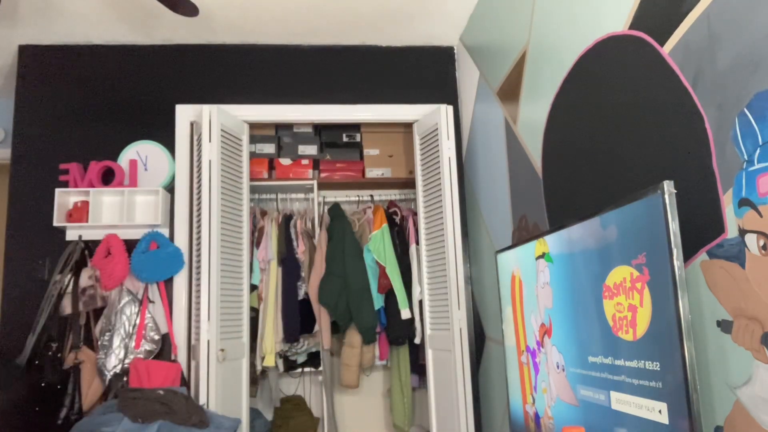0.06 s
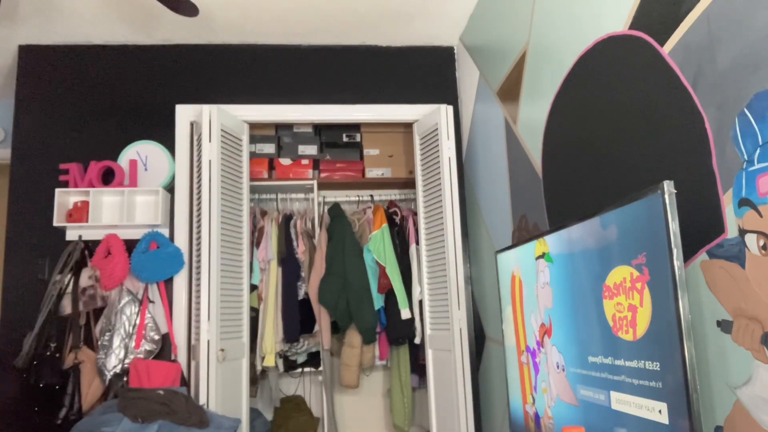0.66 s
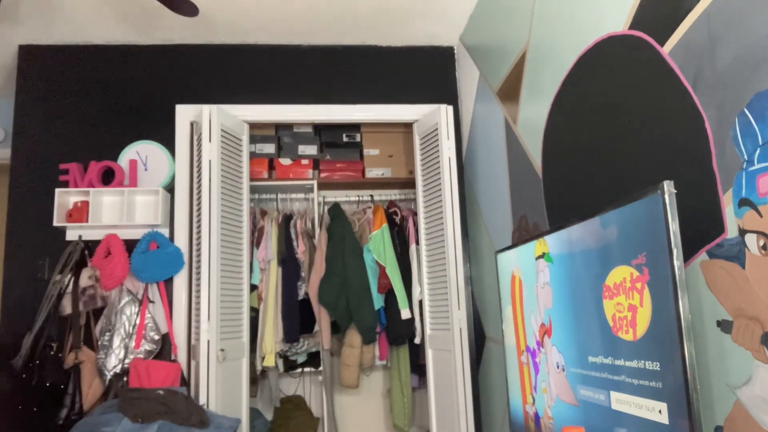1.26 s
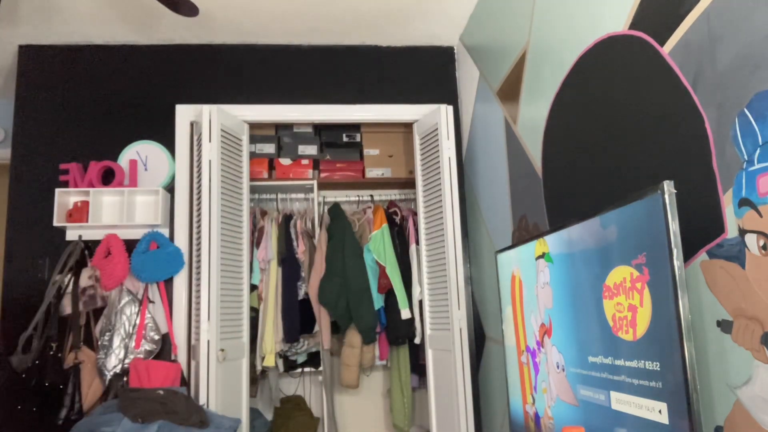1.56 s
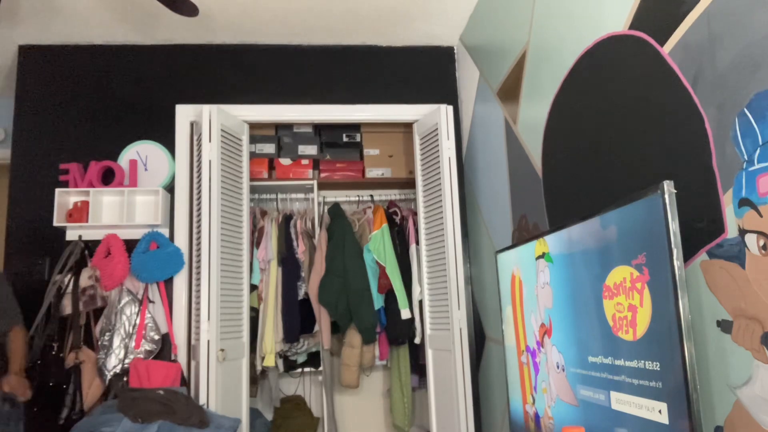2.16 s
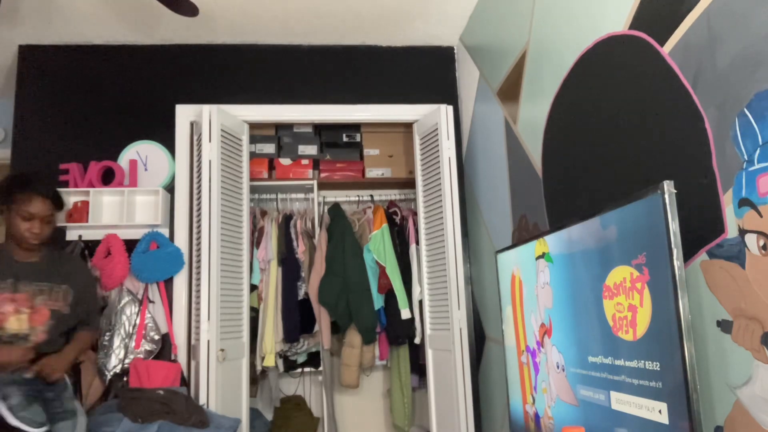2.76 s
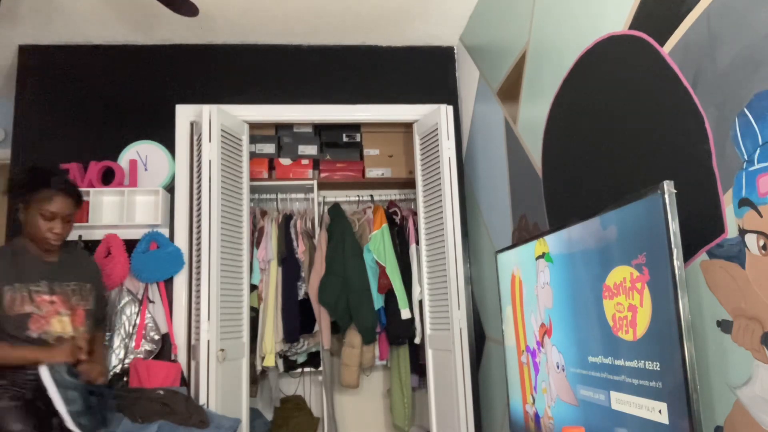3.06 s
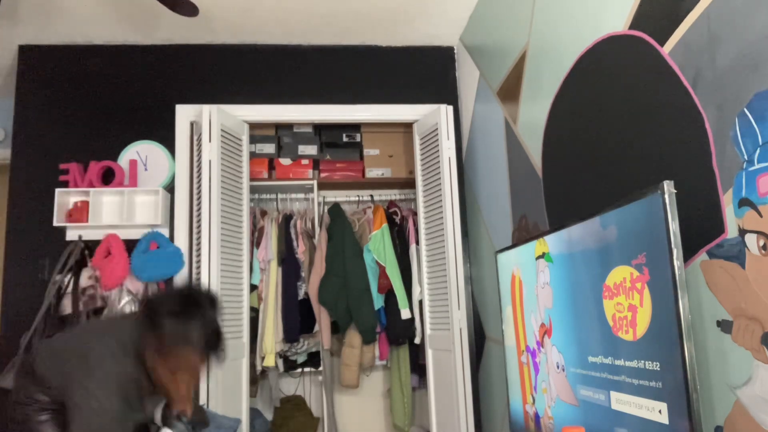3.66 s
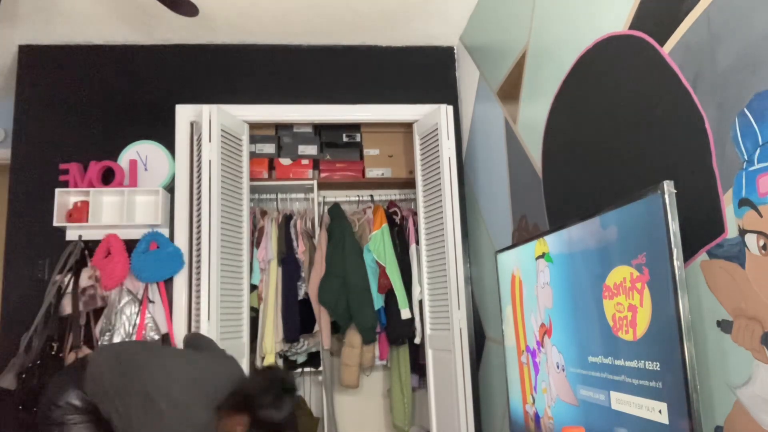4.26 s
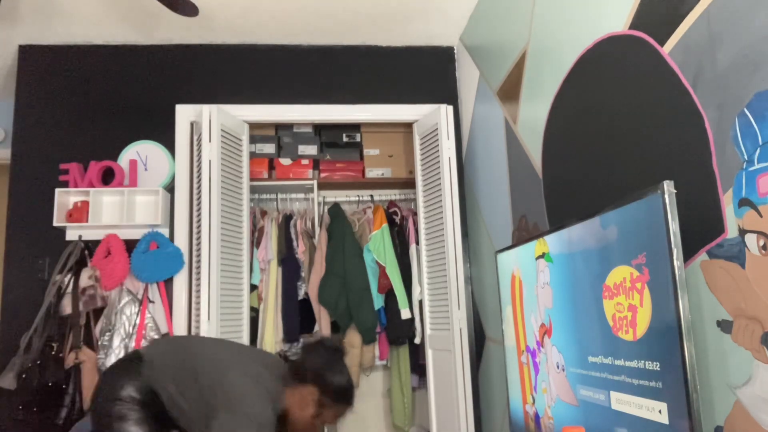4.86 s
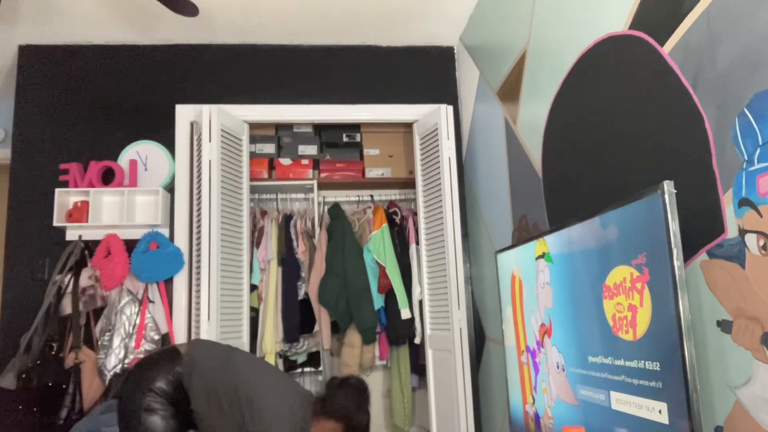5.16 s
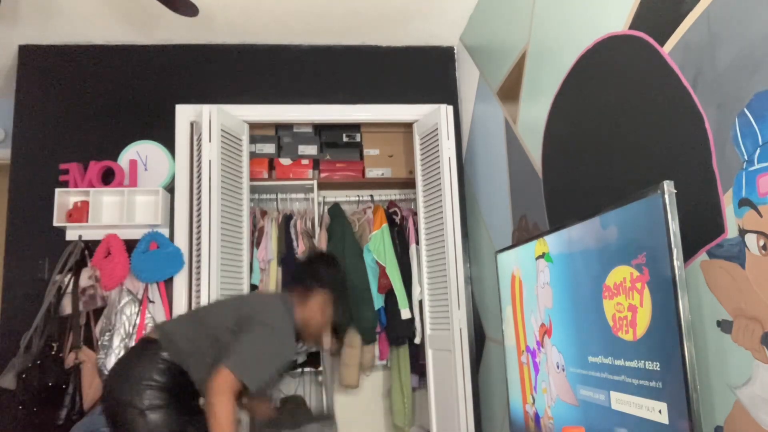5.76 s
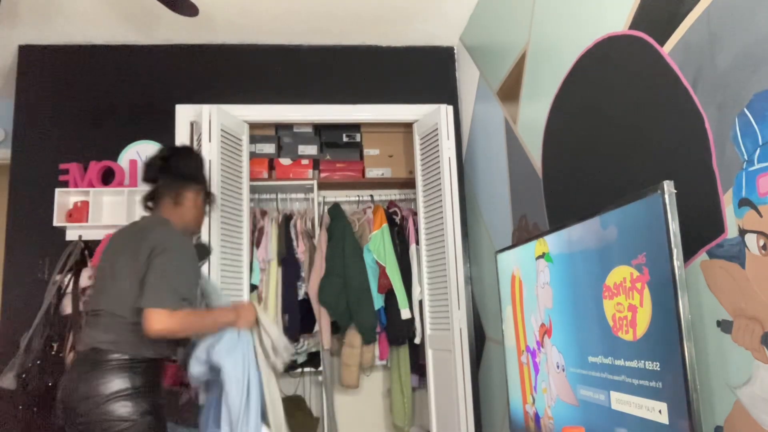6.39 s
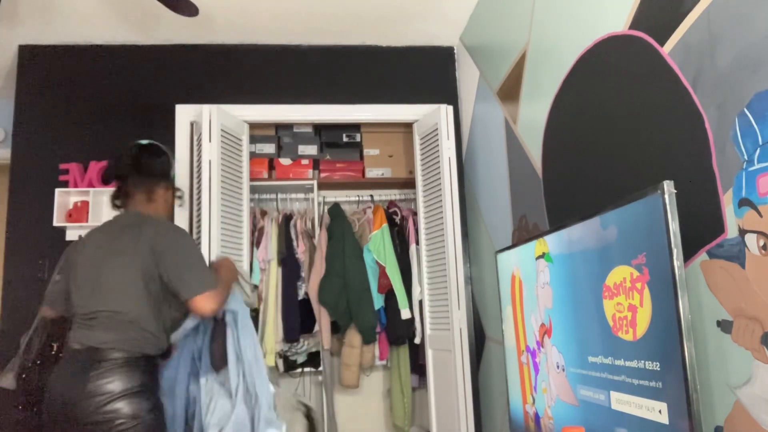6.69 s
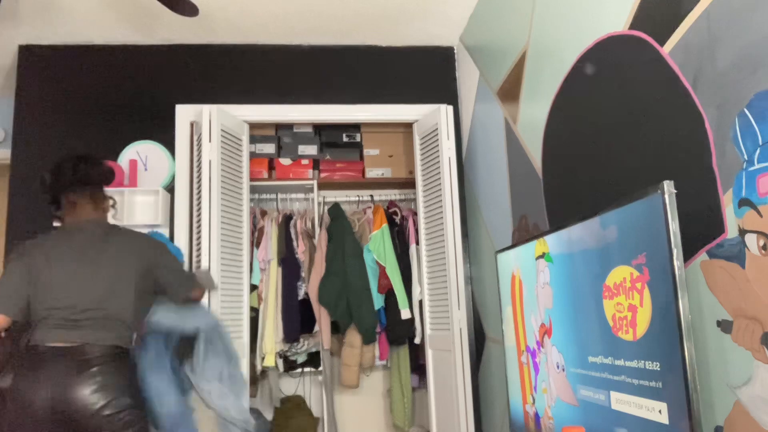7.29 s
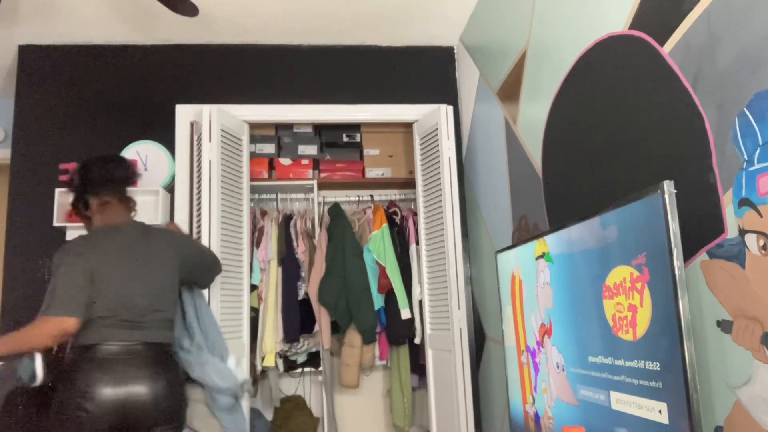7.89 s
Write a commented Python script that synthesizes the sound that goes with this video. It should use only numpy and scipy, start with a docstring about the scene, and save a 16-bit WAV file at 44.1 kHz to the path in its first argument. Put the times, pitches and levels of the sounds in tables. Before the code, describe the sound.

Clothes rustle as someone rummages through a heap in a small room, with soft thumps, hollow knocks and a high metal jingle.

```python
"""Cloth swishes over soft thumps as someone walks into a small bedroom, kneels at a heap of clothes
and pulls out a garment. Stick-slip friction of fibres makes the hiss, buckling creases the crumpling.
Steps and dropped things excite the low modes of floor and room; hard bits in the heap tap and clack.
While the garment is lifted, its small metal fittings collide and ring very high."""
import sys
import numpy as np
from scipy import signal
from scipy.fft import rfft, irfft, next_fast_len
from scipy.io import wavfile

SR = 44100
rng = np.random.default_rng(int(sys.argv[2]) if len(sys.argv) > 2 else 0)


def master(y):
    """Save y as 16-bit WAV."""
    cut = np.clip(np.atleast_2d(y).T, -1, 1)
    pcm = np.round(cut * 32767)  # scale
    wavfile.write(sys.argv[1], SR, pcm.astype(np.int16))


N = 349713

# Noise spectra: (frequency [Hz], relative spectral level [dB])
FLAP_SPECTRUM = [(90, -18), (150, 4.5), (235, 0.5), (340, -1.5), (480, -14.5), (800, -30.5)]  # heavy folds and dull thuds
CRUMPLE_SPECTRUM = [(350, 17), (550, 6.5), (850, 4), (1300, -1.5), (2100, -6), (3000, -5), (5000, -16)]  # creases and woody knocks
CRACK_SPECTRUM = [(900, 6), (1900, 7), (2700, 4), (4200, -2), (6300, -12), (8800, -9), (12000, -14),
                  (15000, -21)]  # hard contact
TICK_SPECTRUM = [(3000, -25), (6300, -6), (8800, -0.5), (11000, 6), (13000, 5.5), (14400, 13), (15200, 9)]  # metal on metal
# Cloth slides over cloth, except the brief fizz at 4.326 s, which goes with the tick of a metal contact: (time
# [s], duration [s], hiss level [dB], fizz level [dB])
SWISHES = [(0.0, 0.067, -39, -43.5), (0.07, .12, -43, -43.5), (0.21, 0.072, -45.5, -52),
           (0.29, 0.032, -42.5, -47), (0.48, 0.25, -46, -47.5), (0.7, 0.16, -48, -55),
           (1.06, 0.32, -49, -54), (1.17, 0.37, -48, -53), (1.495, 0.13, -40.5, -45),
           (1.56, 0.28, -44, -44), (1.76, 0.013, -25.5, -32.5), (1.805, 0.032, -37.5, -41),
           (1.85, 0.086, -44.5, -47), (1.93, 0.23, -47.5, -52.5), (2.1, 0.38, -47.5, -50.5),
           (2.35, 0.64, -48.5, -52), (2.84, 0.091, -38.5, -39), (3.0, 0.17, -50, -55.5),
           (3.21, 0.1, -54, -53), (3.3, 0.41, -45.5, -47.5), (3.6, 0.37, -44.5, -53),
           (3.7, 0.24, -43.5, -42.5), (3.99, 0.062, -55, -44), (4.092, 0.028, -50, -44.5),
           (4.18, 0.12, -49.5, -46.5), (4.326, 0.013, -48, -42.5), (4.34, 0.22, -45, -46),
           (4.55, 0.093, -42.5, -45), (4.66, 0.12, -55, -56), (4.74, 0.14, -45.5, -47.5),
           (4.92, 0.24, -52, -53.5), (5.1, 0.17, -47.5, -48.5), (5.21, 0.17, -44.5, -46),
           (5.34, 0.34, -47.5, -47), (5.495, 0.05, -39, -37.5), (5.56, 0.22, -41, -41.5),
           (5.8, 0.29, -45, -46), (6.06, 0.38, -46, -52), (6.228, 0.037, -44, -40), (6.3, 0.12, -67, -63),
           (6.44, 0.28, -46.5, -43.5), (6.53, 0.065, -43.5, -38), (6.668, 0.059, -35, -33),
           (6.78, 0.16, -47.5, -47.5), (7.0, 0.14, -50.5, -53.5), (7.11, 0.24, -44, -45.5),
           (7.21, 0.32, -45, -48), (7.45, 0.23, -46, -51.5), (7.64, 0.76, -48.5, -52.5)]
SWISH_SHAPE = dict(rise_share=0.32, bulge_db=1, base_t60=0.22)


def from_db(db):
    """Amplitude ratio of a level: a factor of ten per 20 dB."""
    return 10 ** (np.asarray(db) / 20)


def unit_rms(x):
    """Normalisation to unit mean power."""
    return x / np.sqrt(np.mean(x ** 2) + 1e-20)


def at_hz(points, hz):
    """Interpolation of a spectrum on a logarithmic frequency axis."""
    freqs, values = np.transpose(points)
    return np.interp(np.log(hz), np.log(freqs), values)


def add(out, start, sound):
    """Superposition of a sound from its start time on."""
    i = max(int(start * SR), 0)
    out[..., i:i + sound.shape[-1]] += sound[..., :N - i]


def decay(t, t60):
    """Exponential free decay, 60 dB in t60 seconds."""
    return from_db(-60 * t / t60)


def gesture(t, length, rise_s, t60):
    """Envelope of a driven sound: a rise, a hold until length, then free decay."""
    rise = np.sin(np.pi / 2 * np.minimum(t / max(rise_s, 1 / SR), 1))
    return rise * decay(np.maximum(t - length, 0), t60)


def movements(rows, rise_share, bulge_db, base_t60):
    """Incoherent addition: overlapping movements sum in power, giving one envelope per level column."""
    power, t = np.zeros((len(rows[0]) - 2, N)), np.arange(SR) / SR
    for start, length, *levels_db in rows:
        arch = np.sin(np.pi * np.minimum(t / length, 1)) - 2 / np.pi
        t60 = base_t60 + 0.32 * length  # long sweeps take longer to stop
        shape = from_db(bulge_db * arch) * gesture(t, length, rise_share * length, t60)
        add(power, start, (from_db(levels_db)[:, None] * shape) ** 2)
    return np.sqrt(power)


def drift(rate_hz):
    """Low-pass noise: a slow random fluctuation of unit rms."""
    r = np.exp(-80 * np.pi * rate_hz / SR)
    slow = signal.lfilter([1], [1, -2 * r, r * r], rng.standard_normal(N // 40 + 2002))[2000:]
    return np.interp(np.arange(N) / 40, np.arange(len(slow)), unit_rms(slow))


def grains(per_s, spread_db):
    """A Poisson process of clicks of uneven size."""
    sizes = from_db(spread_db * np.minimum(rng.exponential(1, N), 4)) * rng.choice([-1, 1], N)
    return sizes * (rng.random(N) < per_s / SR)


def resonator(drive, hz, t60):
    """A damped oscillator: a unit impulse starts a decaying sine of height 1."""
    r, w = from_db(-60 / (t60 * SR)), 2 * np.pi * min(hz, .45 * SR) / SR
    return signal.lfilter([0, np.sin(w)], [1, -2 * r * np.cos(w), r * r], drive + 1e-18)


def room_gain(at):
    """Resonance lifts narrow bands; interference from near surfaces forms a comb below the treble."""
    # Room and furniture: (frequency [Hz], lift [dB])
    resonances = [(233, 4), (356, -2), (484, -3), (661, 3.5), (732, 3), (873, 1.5), (1039, 3.5), (1187, 3),
                  (1351, 3.5), (1575, 4.5), (1909, 6), (2078, 6), (2410, 6), (2690, 5)]
    # Hard surfaces near the microphones: (delay [s], low-frequency amplitude [ratio])
    reflections = [(.0023, 0.33), (.0051, -0.036), (.0087, 0.2), (0.0132, 0.21)]
    width_hz, rolloff_hz = 94, 840
    hz = np.arange(0, SR / 2, 4)
    lift_db = sum(db / (1 + (2 * (hz - centre) / width_hz) ** 2) for centre, db in resonances)
    echoes = sum(share * np.exp(-2j * np.pi * hz * delay) for delay, share in reflections)
    comb = 1 + echoes / (1 + (hz / rolloff_hz) ** 2)
    return np.interp(at, hz, from_db(lift_db) * np.abs(comb))


def noise(spectrum, size=N):
    """Partly coherent stereo noise of unit rms, coloured by the room."""
    # Likeness of the channels: (frequency [Hz], correlation [-1 to 1])
    likeness = [(60, 0.92), (170, 0.94), (350, 0.52), (550, 0.088), (1400, 0.2), (2000, -0.27),
                (3000, -0.27), (4300, 0.11), (6000, -0.38), (6900, -0.56), (8400, 1), (9400, 0.86),
                (10200, -0.044), (10900, -1), (11900, -1), (12600, 0.37), (13300, 0.97), (14300, 0.83),
                (15200, -0.23)]
    padded = next_fast_len(size)
    hz = np.maximum(np.fft.rfftfreq(padded, 1 / SR), 1)
    skirts = 1 / (1 + (spectrum[0][0] / hz) ** 4) / (1 + (hz / spectrum[-1][0] / 2) ** 4)
    gain = from_db(at_hz(spectrum, hz)) * skirts * room_gain(hz)
    mid, side = rfft(rng.standard_normal((2, padded))) * gain
    alike = np.clip(at_hz(likeness, hz), -.998, .998)
    mid, side = mid * np.sqrt(1 + alike), side * np.sqrt(1 - alike)
    return unit_rms(irfft(np.array([mid + side, mid - side]), padded)[:, :size])


def bedroom(x, t60, wet_db):
    """Reverberation: dense reflections from close walls follow the direct sound."""
    t = np.arange(SR // 2) / SR
    tail = noise([(30, 0), (16000, 0)], len(t)) * decay(t, t60) * (t > .002)
    tail *= from_db(wet_db) / np.sqrt(np.sum(tail ** 2) / 2)
    wet = signal.fftconvolve(np.atleast_2d(x), tail, axes=1)[:, :N]
    return (x + wet) / np.sqrt(1 + from_db(2 * wet_db))


def slip_envelope(slips, slip_t60, room_db):
    """Energy summation: each slip dies quickly and leaves a little reverberation."""
    t = np.arange(SR // 4) / SR
    power = decay(t, slip_t60) ** 2 + (from_db(room_db) * decay(t, 0.42)) ** 2
    return np.sqrt(np.abs(signal.fftconvolve(slips ** 2, power)[:len(slips)]))


def rustle(spectrum, per_s, spread_db, patchy_db, slip_t60):
    """Stick-slip noise of unit rms: contacts catch and let go in clumps."""
    slips = grains(per_s, spread_db) * from_db(patchy_db * drift(17.3))
    return unit_rms(slip_envelope(slips, slip_t60, room_db=-10) * noise(spectrum))


def struck(modes, t, damping_s, pitch_hz, focus_db):
    """Modal response: a blow favours modes near its pitch; cloth adds 30 dB of decay per damping_s."""
    hz, level_db, own_t60 = np.transpose(modes)[:, :, None]
    octaves_away = np.abs(np.log2(hz / pitch_hz))
    gain = from_db(level_db - focus_db * octaves_away + rng.normal(0, 1.0, hz.shape))
    # higher modes differ more between the microphones
    phase = np.pi * np.arange(len(hz))[:, None] + rng.normal(0, 1, (2, *hz.shape)) * hz / 700
    detuned_hz = hz * (1 + rng.normal(0, .012, hz.shape))  # grip and load shift the modes
    waves = gain * np.sin(2 * np.pi * detuned_hz * t + phase) * decay(t, own_t60)
    return np.sum(waves, axis=1) * decay(t, 2 * damping_s) / np.sqrt(np.sum(gain ** 2) / 2)


def room_air():
    """Stationary broadband noise: the quiet air of the room."""
    # Background: (frequency [Hz], relative spectral level [dB])
    spectrum = [(25, -3), (58, 7), (110, -6), (230, -2.5), (500, -13.5), (1500, -21), (4300, -17),
                (6500, -26), (9000, -23.5), (15000, -34)]
    return from_db(-48) * noise(spectrum)


def floor_booms():
    """Steps, bumps and a dropped thing excite a low resonance of floor and room, which decays freely."""
    # Low floor booms: (time [s], level [dB])
    booms = [(0.0, -31), (0.64, -38.5), (1.468, -46), (1.659, -45), (1.8, -23), (1.94, -34), (2.29, -43),
             (2.86, -38), (3.8, -55), (4.58, -44), (4.77, -34), (5.24, -27), (5.33, -35), (5.62, -40.5),
             (5.789, -42), (6.27, -22), (6.36, -32), (6.59, -31.5), (7.19, -40), (7.4, -43)]
    # Floor rumble: (frequency [Hz], relative spectral level [dB])
    rumble = [(36, -9), (46, -20), (58, 1), (75, -7.5), (110, -21)]
    power, t = np.zeros(N), np.arange(SR) / SR
    shape = gesture(t, length=0.021, rise_s=0.021, t60=0.57)
    for start, level_db in booms:
        add(power, start, (from_db(level_db) * shape) ** 2)
    return np.sqrt(power) * noise(rumble)


def floor_blows():
    """Padded impacts drive the floor's modes: crack and knock rise fast, thud and boom more slowly."""
    # Impacts: (time [s], thud level [dB], thud pitch [Hz], boom [dB], knock [dB], crack [dB])
    blows = [(0.009, -36.5, 160, -37, -54, -43), (0.166, -32.5, 308, -29.5, -39, -55),
             (0.391, -31.5, 188, -35, -62, -60), (0.52, -41, 380, -35, -44, -44),
             (1.638, -21, 180, -17, -56, -52), (1.757, -9, 307, -39, -23.5, -23.5),
             (1.764, -7, 163, -12, -27, -17), (2.205, -32, 158.6, -34, -45, -44),
             (2.582, -61, 110.6, -36, -69, -63), (2.738, -28, 380, -51, -40.5, -59),
             (3.004, -28, 254.4, -41.5, -45, -61), (3.564, -76, 155.5, -27.5, -72, -58),
             (3.676, -28.5, 146, -57, -54, -70), (3.88, -28.5, 220, -36, -29, -30),
             (3.908, -24.5, 168, -29.5, -43, -55), (4.002, -30.5, 430, -48, -40.5, -34),
             (4.725, -34, 218, -37, -45, -44), (4.808, -29, 187, -53, -41, -39),
             (5.714, -24, 298, -34, -25, -49), (5.851, -32, 250, -61, -39, -58),
             (6.576, -22.5, 275, -38, -34, -38), (6.615, -27.5, 374, -24.5, -33, -57),
             (6.668, -18.5, 218, -57, -30, -52), (7.007, -34, 239, -44, -41, -59),
             (7.204, -28, 250, -41, -53, -46), (7.389, -27, 252, -31.5, -34, -37.5)]
    # Modes of floor and furniture: (frequency [Hz], relative level [dB], own T60 [s])
    thud_modes = [(148.8, -1.5, 0.78), (173, 0, 0.16), (191.8, 0, .4), (228, 3.5, 0.41), (271.3, -8.5, 0.4),
                  (301.4, -3, 0.37), (356, -0.5, 0.27)]
    knock_modes = [(471, 7, 0.15), (554.5, 4.5, 0.28), (631, -5, 0.43), (868, 1, .2), (1020, -4, .16),
                   (1190, -2, 0.18), (1373, -8, 0.23)]
    damping_s = 0.19
    out, t = np.zeros((2, N)), np.arange(SR * 3 // 5) / SR
    contact, swell = 1 - np.exp(-t / 0.0032), 1 - np.exp(-t / 0.0075)
    boom = np.sin(2 * np.pi * 58.9 * t) * decay(t, 0.56)
    boom += from_db(-10) * np.sin(2 * np.pi * 78 * t) * decay(t, 0.46)
    # modes too dense to count ring as noise
    spectra = FLAP_SPECTRUM, CRUMPLE_SPECTRUM, CRACK_SPECTRUM
    dense = np.array([noise(spectrum, 4 * len(t)) for spectrum in spectra])
    for start, thud_db, pitch_hz, boom_db, knock_db, crack_db in blows:
        offset = rng.integers(dense.shape[-1] - len(t))
        dull, woody, bright = dense[:, :, offset:offset + len(t)]
        thud = struck(thud_modes, t, damping_s, pitch_hz, focus_db=13.5)
        thud += from_db(-6) * dull * decay(t, 1.53 * damping_s)
        knock = struck(knock_modes, t, damping_s, 2 * pitch_hz, focus_db=2.5)
        knock += from_db(-3.5) * woody * decay(t, 1.07 * damping_s)
        crack = bright * (decay(t, 0.38 * damping_s) + from_db(-11) * decay(t, 1.3 * damping_s))
        low = from_db(thud_db) * thud + from_db(boom_db) * boom
        high = from_db(knock_db) * knock + from_db(crack_db) * crack
        add(out, start, swell * low + contact * high)
    return out


def hollow_knocks(rows, body_modes, wall_modes, damping_s, focus_db, dense_db, tail_db):
    """Impact on a shell: the contact cracks, the walls ring, the body thuds and the room hums on."""
    out, t = np.zeros((2, N)), np.arange(SR // 2) / SR
    contact, swell = 1 - np.exp(-t / 0.0016), 1 - np.exp(-t / 0.0043)
    for start, thud_db, thud_hz, ring_db, ring_hz, crack_db in rows:
        thud = struck(body_modes, t, damping_s, thud_hz, focus_db=16)
        thud += from_db(tail_db) * noise(FLAP_SPECTRUM, len(t)) * decay(t, 0.62)
        dense = noise([(ring_hz / 2, -2), (ring_hz, 0), (2 * ring_hz, -14), (4 * ring_hz, -28)], len(t))
        walls = struck(wall_modes, t, damping_s, ring_hz, focus_db)
        walls += from_db(dense_db) * dense * decay(t, 0.65 * damping_s)
        crack = noise(CRACK_SPECTRUM, len(t)) * (decay(t, 0.15) + from_db(-18) * decay(t, 0.17))
        high = from_db(ring_db) * walls + from_db(crack_db) * crack
        add(out, start, swell * from_db(thud_db) * thud + contact * high)
    return out


def box_bumps():
    """Heavily damped shell modes: something like a box is bumped in the heap."""
    # Bumps: (time [s], thud level [dB], thud pitch [Hz], ring [dB], ring pitch [Hz], crack [dB])
    bumps = [(5.192, -17, 280, -43, 650, -45), (5.205, -12.5, 284, -24, 650, -30.5),
             (5.222, -8.5, 229, -21.5, 840, -46), (5.262, -13.5, 205, -31, 620, -33),
             (5.287, -29, 199, -48, 620, -60), (5.36, -21, 218, -46, 620, -37),
             (5.421, -13.5, 188, -27.5, 696, -39), (5.431, -16.5, 338, -32, 617, -56),
             (5.683, -19.5, 236, -35.5, 620, -52)]
    # Modes of the box: (frequency [Hz], relative level [dB], own T60 [s])
    body = [(148.4, 0, 0.75), (189.3, 2.5, 0.46), (210, -1, 0.16), (245, 0, 0.27), (280, 1, 0.077),
            (329, 0.5, 0.12)]
    walls = [(436, 4, 0.1), (570, 0, 0.17), (657, 3.5, 0.25), (840, -2, 0.26), (1003, -11, 0.2)]
    return hollow_knocks(bumps, body, walls, damping_s=0.12, focus_db=7, dense_db=-7, tail_db=-19)


def dropped_thing():
    """Lightly damped shell modes: a hard hollow thing drops, rocks and lands on another edge."""
    # Landings: (time [s], thud level [dB], thud pitch [Hz], ring [dB], ring pitch [Hz], crack [dB])
    drops = [(6.229, -15, 356, -14.5, 910, -19.5), (6.238, -13, 276, -10.5, 553, -20.5),
             (6.262, -12, 240, -26, 850, -46), (6.331, -21.5, 253, -23, 1010, -39)]
    # Its modes: (frequency [Hz], relative level [dB], own T60 [s])
    body = [(190, 10.5, 0.56), (231, 0, 1), (248.6, 2.5, 0.59), (299, 3, 0.33), (345, -2, 0.37),
            (392, -1, 0.47)]
    walls = [(490, 3, 0.31), (628, -11, 0.3), (820, -9, 0.13), (871, 4.5, 0.26), (946, -20, 0.22),
             (1052, 6, 0.16), (1170, -4, 0.17), (1320, -1, 0.063), (1550, 3, 0.13)]
    return hollow_knocks(drops, body, walls, damping_s=0.34, focus_db=5, dense_db=-4.5, tail_db=-16)


def taps():
    """Impulse response of a small stiff thing: a click with a little room, and a few brief modes."""
    # Light taps: (time [s], level [dB], pitch [Hz])
    hits = [(0.95, -51, 1340), (2.852, -38, 1410), (2.957, -35, 1150), (3.007, -43, 790), (3.101, -47, 880),
            (3.1967, -36, 1050), (3.201, -48, 2200), (7.631, -37.5, 800), (7.662, -39.5, 708)]
    # Its modes: (frequency [Hz], relative level [dB], own T60 [s])
    modes = [(546, 0, .1), (700, 5, .28), (829, 4.5, 0.28), (887, -1, 0.26), (1120, 0, 0.26),
             (1420, 1, 0.23), (2170, -6, 0.11), (2250, -13, .18)]
    out, t = np.zeros((2, N)), np.arange(SR // 4) / SR
    for start, level_db, hz in hits:
        click = noise([(hz / 3, -6), (hz, 0), (2 * hz, -7), (4 * hz, -26)], len(t))
        click *= decay(t, 0.073) + from_db(-13) * decay(t, .25)
        body = struck(modes, t, damping_s=.32, pitch_hz=hz, focus_db=23)
        add(out, start, from_db(level_db) * (click + from_db(-0.5) * body))
    return out


def clacks():
    """Brief contact between hard pieces radiates a bright burst and leaves a trace of reverberation."""
    # Collisions: (time [s], level [dB])
    hits = [(6.298, -39), (6.3055, -25), (6.331, -30), (6.337, -24), (6.346, -38)]
    # The burst: (frequency [Hz], relative spectral level [dB])
    spectrum = [(1400, -34), (1800, 5), (2100, 9), (2800, 1.5), (3100, -2), (3500, -35), (6000, -45)]
    out, t = np.zeros((2, N)), np.arange(SR // 4) / SR
    shape = gesture(t, length=0.0058, rise_s=0.0018, t60=0.068) + from_db(-22) * decay(t, .25)
    for start, level_db in hits:
        add(out, start, from_db(level_db) * shape * noise(spectrum, len(t)))
    return out


def creaks():
    """Nearly periodic stick-slip makes a short tone that rises as the load grows."""
    # Creaks: (time [s], duration [s], level [dB], starting pitch [Hz])
    slips = [(2.907, 0.016, -40, 5400), (5.363, 0.017, -31, 587)]
    glide_hz_per_s, jitter = 2500, 0.021
    out, t = np.zeros(N), np.arange(SR // 8) / SR
    for start, length, level_db, start_hz in slips:
        hz = (start_hz + glide_hz_per_s * t) * (1 + jitter * drift(150)[:len(t)])
        tone = np.sin(2 * np.pi * np.cumsum(hz) / SR)
        add(out, start, from_db(level_db) * gesture(t, length, rise_s=0.005, t60=0.063) * tone)
    return bedroom(out, t60=0.24, wet_db=-8)


def scrapes():
    """Irregular stick-slip of a dragged edge makes a swelling band of noise around one pitch."""
    # Short drags under the clothes: (time [s], duration [s], level [dB], pitch [Hz])
    drags = [(0.01, 0.077, -42.5, 1250), (0.163, 0.081, -48, 1100), (0.565, 0.11, -54, 1000),
             (3.987, .04, -28.5, 865), (3.999, 0.032, -38, 2630), (4.161, 0.083, -41.5, 950),
             (4.379, 0.047, -43, 1400), (4.442, 0.13, -44, 1340), (4.556, 0.022, -36.5, 1850),
             (7.295, .09, -45, 1900), (7.522, 0.042, -51, 1300)]
    out, t = np.zeros((2, N)), np.arange(SR // 2) / SR
    for start, length, level_db, hz in drags:
        band = noise([(hz / 3, -9), (hz * 0.6, -4), (hz, 0), (hz * 1.6, -8), (hz * 3, -17)], len(t))
        add(out, start, from_db(level_db) * gesture(t, length, rise_s=0.48 * length, t60=0.26) * band)
    slips = grains(per_s=840, spread_db=1.0)
    return out * unit_rms(slip_envelope(slips, slip_t60=0.013, room_db=-11))


def jingle():
    """Random collisions of tiny metal parts tick and excite very high modes and a fainter lower pair."""
    # Shakes: (time [s], duration [s], high ring level [dB], ticking [dB], ring of a larger part [dB])
    shakes = [(4.335, 0.06, -61, -60, -75), (4.48, 0.067, -54, -48, -75), (4.742, 0.072, -55, -58, -70),
              (4.86, 0.037, -55, -56, -75), (4.95, 0.031, -48, -51, -75), (5.44, 0.36, -46, -35, -63),
              (5.57, 0.13, -31, -28, -50), (5.69, 0.073, -27, -28, -42.5), (5.89, 0.12, -43, -42, -62),
              (5.99, 0.038, -37, -35, -66), (6.08, 0.088, -38.5, -49, -75), (6.225, 0.045, -54, -45, -46),
              (6.3, 0.34, -35.5, -40.5, -68), (6.455, 0.053, -53, -49, -47), (6.54, 0.093, -41, -33.5, -52),
              (6.67, 0.056, -40, -38, -54), (6.74, 0.13, -43, -62, -70)]
    # Modes of the fittings: (frequency [Hz], relative level [dB], T60 [s])
    modes = [(13600, -19, 0.077), (14100, -12, 0.038), (13900, -7, 0.054), (13900, -10, 0.03),
             (14670, 11, 0.083), (14720, -13, .025)]
    high_gain, tick_gain, low_gain = movements(shakes, rise_share=0.27, bulge_db=1.5, base_t60=0.27)
    touches = grains(per_s=700, spread_db=2.5)
    high = sum(from_db(db) * resonator(touches * rng.normal(1, 0.97, N), hz, t60)
               for hz, db, t60 in modes)
    high = unit_rms(bedroom(high, t60=.2, wet_db=-4))
    ticks = rustle(TICK_SPECTRUM, per_s=350, spread_db=6.0, patchy_db=-1.0, slip_t60=0.004)
    low = resonator(touches, hz=4650, t60=.07) + resonator(touches, hz=4740, t60=.06)
    low = unit_rms(bedroom(low, t60=.2, wet_db=-4))
    return high_gain * high + tick_gain * ticks + low_gain * low


def clinks():
    """Beating: after the dry tick of a single metal contact, two close modes interfere."""
    # Contacts: (time [s], ring level [dB], pitch [Hz], tick level [dB])
    touches = [(4.325, -42, 14200, -34), (4.4822, -35, 14150, -48), (4.5531, -38, 14300, -52),
               (4.741, -36, 14160, -49), (5.7044, -14, 14300, -26), (5.7269, -12, 14200, -28),
               (5.7478, -15, 14350, -25), (5.833, -34, 14400, -38), (5.889, -28, 14700, -24),
               (5.928, -23, 14400, -38), (5.952, -22, 14600, -37), (6.0122, -14.5, 14300, -41),
               (6.149, -28, 15000, -42), (6.3614, -29, 14200, -42), (6.461, -20, 14600, -26),
               (6.6029, -17, 14460, -31), (6.6568, -18, 14450, -38)]
    out, t = np.zeros((2, N)), np.arange(SR // 4) / SR
    for start, ring_db, hz, tick_db in touches:
        beat_hz = rng.uniform(40, 140)
        pair = np.sin(2 * np.pi * hz * t) + .5 * np.sin(2 * np.pi * (hz + beat_hz) * t)
        ringing = pair * decay(t, 0.059) * (1 - np.exp(-t / 0.0014))
        tick = noise(TICK_SPECTRUM, len(t)) * gesture(t, length=.002, rise_s=0.0022, t60=0.025)
        add(out, start, from_db(ring_db) * ringing + from_db(tick_db) * tick)
    return bedroom(out, t60=.3, wet_db=-7)


def fold_snaps():
    """Buckling: a fold gives way in one snap, then a dying run of further ones around the same pitch."""
    # Folds: (time [s], level at the envelope's peak [dB], pitch [Hz], duration [s])
    folds = [(0.051, -37, 396, 0.25), (0.631, -41.5, 1130, 0.049), (0.704, -48, 686, 0.04),
             (1.046, -47, 878, 0.025), (2.255, -37.5, 356, 0.054), (2.733, -48, 434, 0.21),
             (2.889, -35, 1320, 0.04), (3.663, -45, 746, 0.056), (4.406, -33.5, 292, 0.025),
             (4.624, -47, 1460, 0.059), (7.237, -29, 413, 0.013)]
    snaps_per_s = 2100
    out, t = np.zeros((2, N)), np.arange(SR // 4) / SR
    for start, peak_db, hz, length in folds:
        run = rng.standard_normal(len(t)) * (rng.random(len(t)) < snaps_per_s / SR)
        run *= np.exp(-2 * t / length)
        run[0] = 2  # the first snap
        envelope = slip_envelope(run, slip_t60=0.11, room_db=-13.5) * (1 - np.exp(-t / 0.0014))
        band = noise([(hz / 4, -11), (hz * .85, -4), (hz, 0), (hz * 1.08, -10), (hz * 5, -25)], len(t))
        add(out, start, from_db(peak_db) * band * envelope / envelope.max())
    return out


def crinkles():
    """While cloth slides, small creases pop at random, each a damped oscillation at one of ten pitches."""
    slide = movements(SWISHES, **SWISH_SHAPE)[0]
    pops = sum(resonator(grains(per_s=5, spread_db=2.5) * rng.normal(1, .7, (2, N)), hz, t60=14 / hz)
               for hz in np.geomspace(900, 4800, num=10))
    return slide * from_db(-9) * unit_rms(bedroom(pops, t60=.2, wet_db=0))


def cloth():
    """Friction makes sliding cloth hiss and fizz; in a grab, creases buckle and heavy folds flap."""
    # A handful is bunched up: (time [s], duration [s], crumple level [dB], flap level [dB])
    grabs = [(0.0, 0.028, -34.5, -47), (0.14, 0.17, -40, -37), (0.36, 0.35, -52, -43),
             (0.53, 0.27, -41.5, -43.5), (1.49, 0.24, -40, -37.5), (1.79, 0.025, -30.5, -24),
             (1.85, 0.1, -47, -33.5), (2.86, 0.12, -40.5, -36.5), (3.01, 0.18, -52, -45.5),
             (3.23, 0.042, -45, -45), (3.48, 0.011, -45.5, -48), (3.63, 0.23, -63, -44),
             (3.865, 0.055, -39, -40), (3.995, 0.055, -40, -32), (4.14, 0.23, -44, -44),
             (4.37, 0.33, -43.5, -44.5), (4.73, 0.26, -47, -44.5), (5.03, 0.24, -48.5, -45.5),
             (5.18, 0.1, -35.5, -36), (5.35, 0.11, -41.5, -35), (5.53, 0.4, -45, -39.5),
             (5.87, 0.3, -50, -50), (6.235, 0.12, -31, -36), (6.45, 0.097, -42, -35),
             (6.56, 0.14, -38, -29.5), (7.0, 0.091, -42.5, -47), (7.18, 0.24, -40, -38.5),
             (7.47, 0.11, -41, -39.5), (7.635, 0.15, -46, -44), (7.85, 0.042, -44, -45.5)]
    # Sliding faces and their fibres: (frequency [Hz], relative spectral level [dB])
    slide_spectrum = [(700, -2), (1500, 1.5), (2200, 3), (3100, 6), (4300, 6.5), (5500, 3), (7000, 0.5),
                      (10000, -45)]
    fizz_spectrum = [(4500, -8), (6500, -0.5), (8500, 3), (10200, 1), (11500, -1), (13000, -3.5),
                     (15000, -7)]
    slide, fizz = movements(SWISHES, **SWISH_SHAPE)
    crumple, flap = movements(grabs, rise_share=0.063, bulge_db=2, base_t60=0.37)
    return (slide * rustle(slide_spectrum, per_s=9500, spread_db=4.5, patchy_db=1.5, slip_t60=0.028)
            + fizz * rustle(fizz_spectrum, per_s=1800, spread_db=3.0, patchy_db=1.5, slip_t60=0.024)
            + crumple * rustle(CRUMPLE_SPECTRUM, per_s=310, spread_db=-2.5, patchy_db=3, slip_t60=0.015)
            + flap * rustle(FLAP_SPECTRUM, per_s=270, spread_db=2.0, patchy_db=0, slip_t60=0.035))


def scene():
    """Linear superposition of all the sources over the room's quiet air."""
    thumps = floor_blows() + box_bumps() + dropped_thing()
    small_things = taps() + clacks() + creaks() + jingle() + clinks()
    clothes = cloth() + crinkles() + fold_snaps()
    return thumps + small_things + clothes + scrapes() + floor_booms() + room_air()


def record(dry):
    """Frequency response of two unequal microphones: deep bass is lost, peaks clip, the top is cut."""
    # Channel imbalance: (frequency [Hz], left minus right level [dB])
    imbalance = [(60, -3), (220, -1.5), (400, 1.5), (900, 0.9), (1500, 2.5), (4600, 1.5), (8000, 0)]
    padded = next_fast_len(N + SR // 4)
    lean_db = at_hz(imbalance, np.maximum(np.fft.rfftfreq(padded, 1 / SR), 1))
    coloured = irfft(rfft(dry, padded) * from_db([lean_db / 2, -lean_db / 2]), padded)[:, :N]
    low_cut = signal.butter(2, 28, "high", fs=SR, output="sos")
    high_cut = signal.ellip(10, .2, 90, 15400, fs=SR, output="sos")
    clipped = np.clip(signal.sosfilt(low_cut, coloured), -1, 1)
    return signal.sosfilt(high_cut, clipped)


dry = scene()
out = record(dry)
master(out)
```